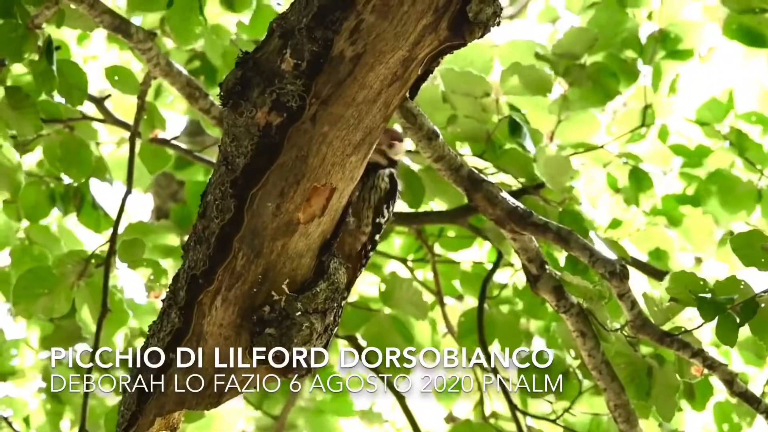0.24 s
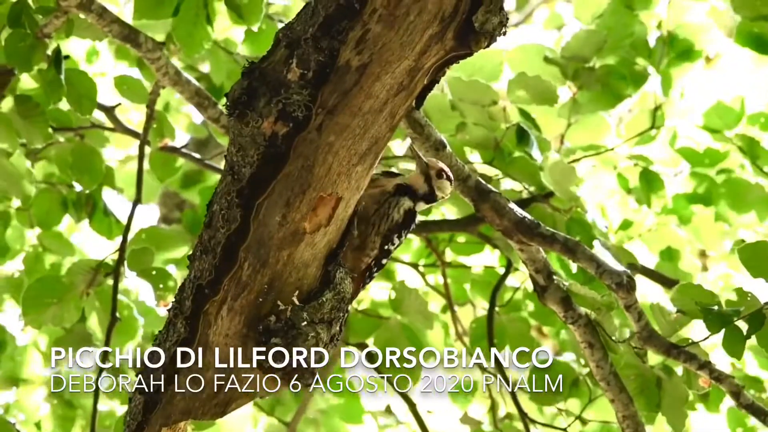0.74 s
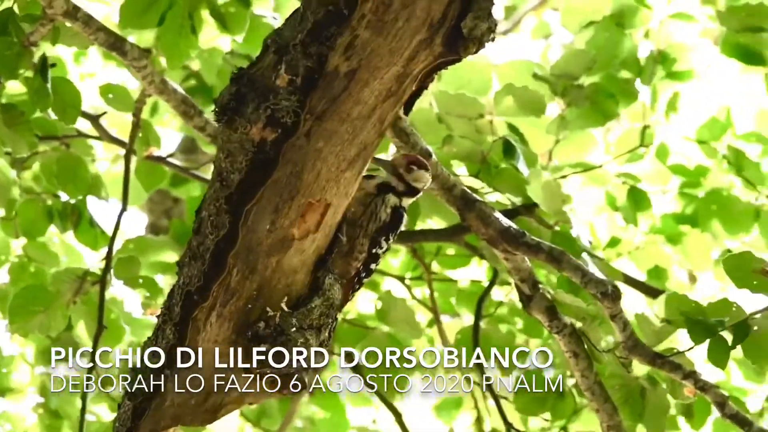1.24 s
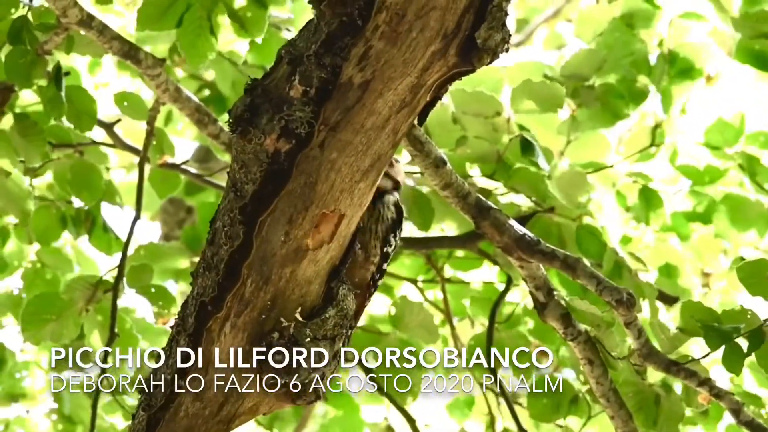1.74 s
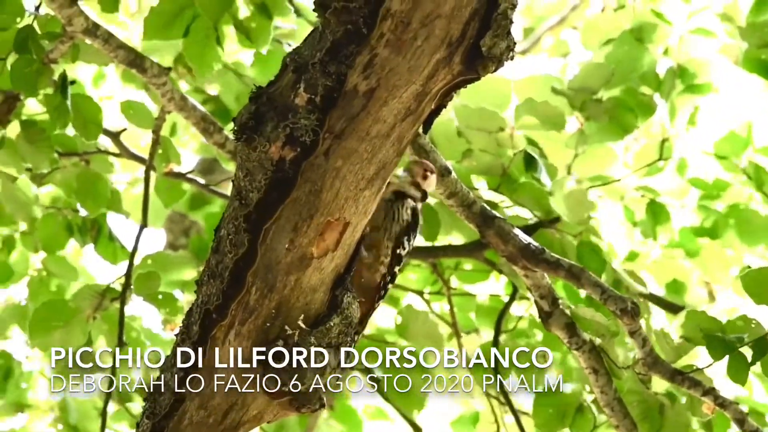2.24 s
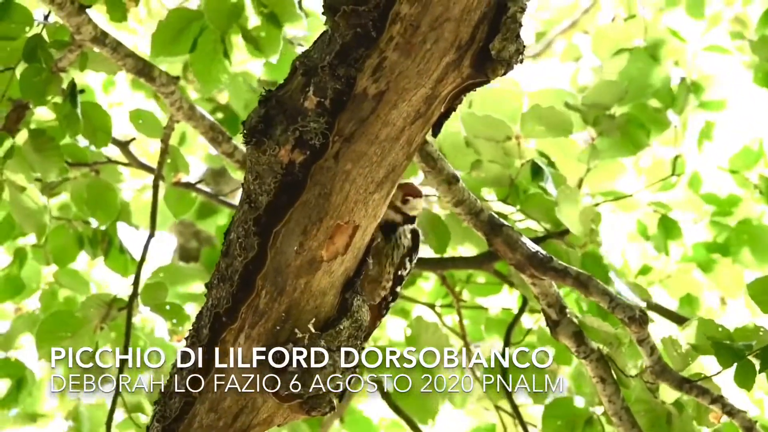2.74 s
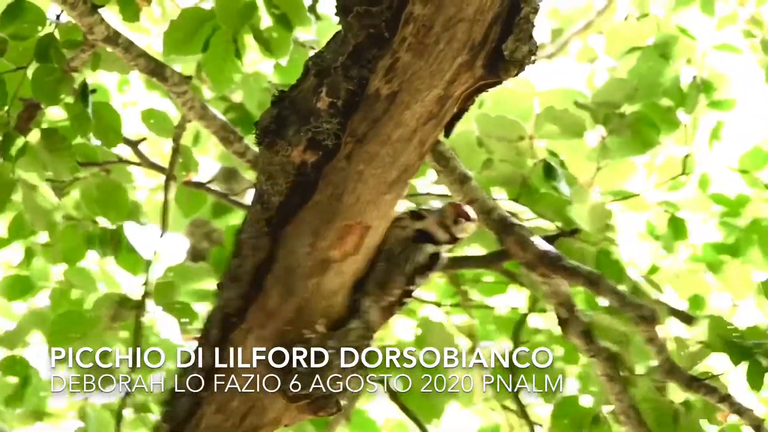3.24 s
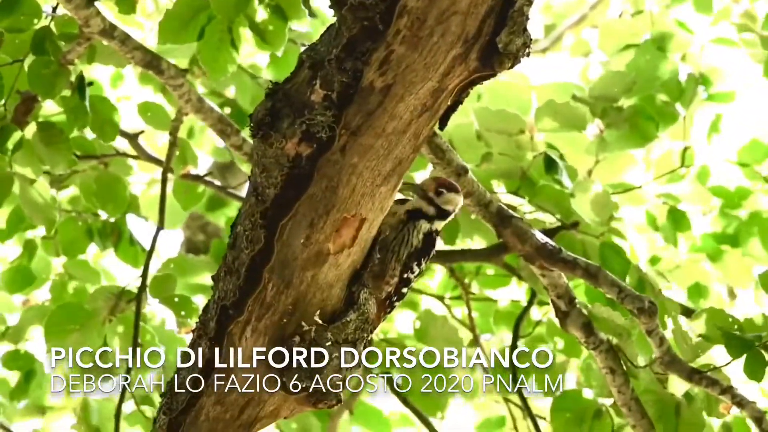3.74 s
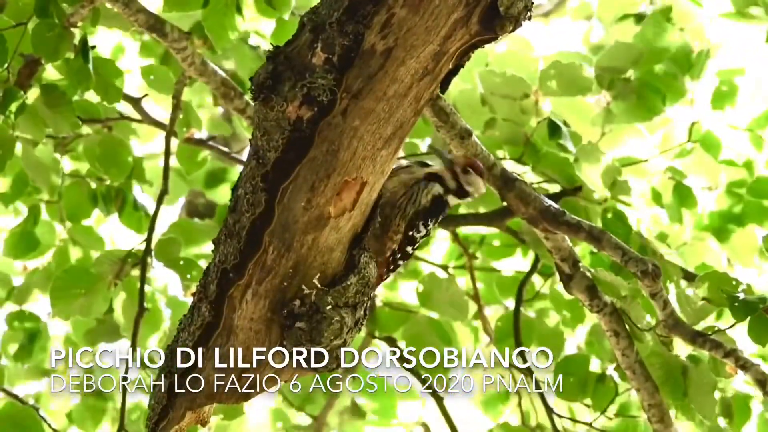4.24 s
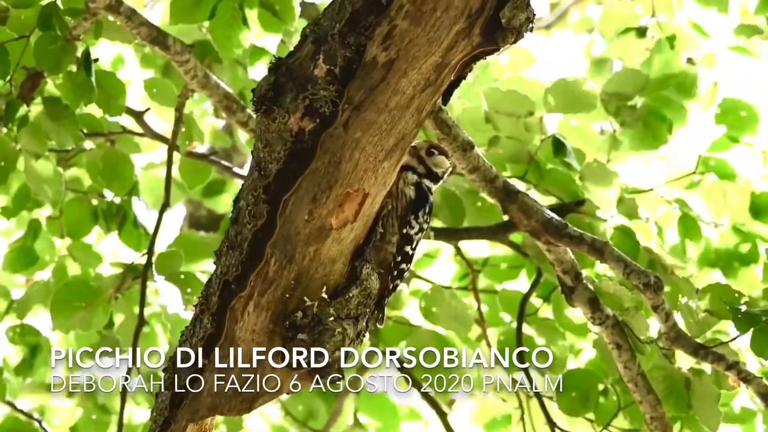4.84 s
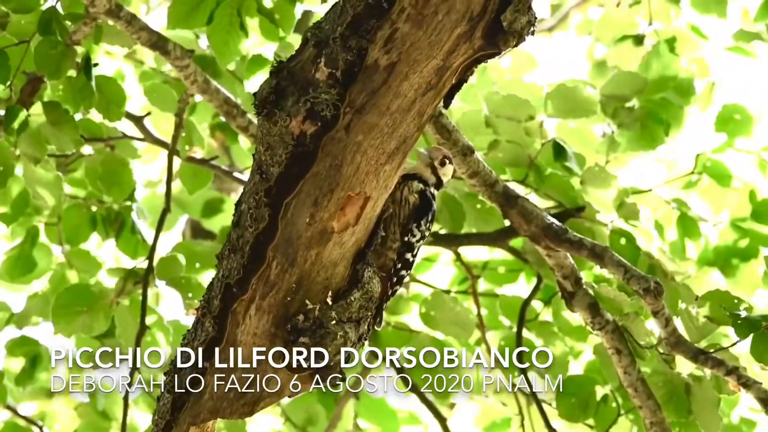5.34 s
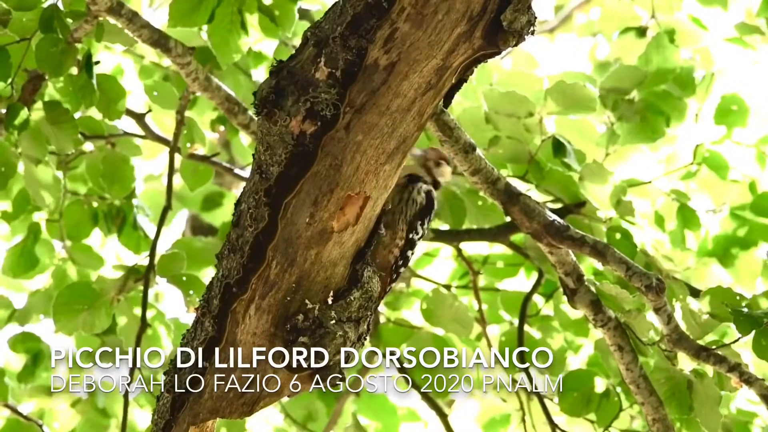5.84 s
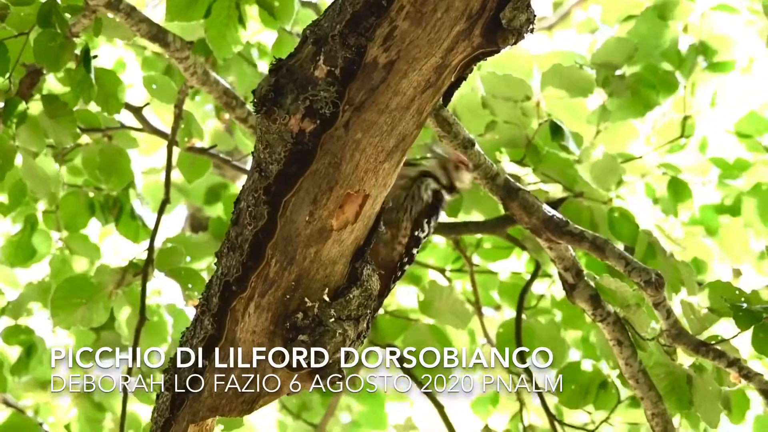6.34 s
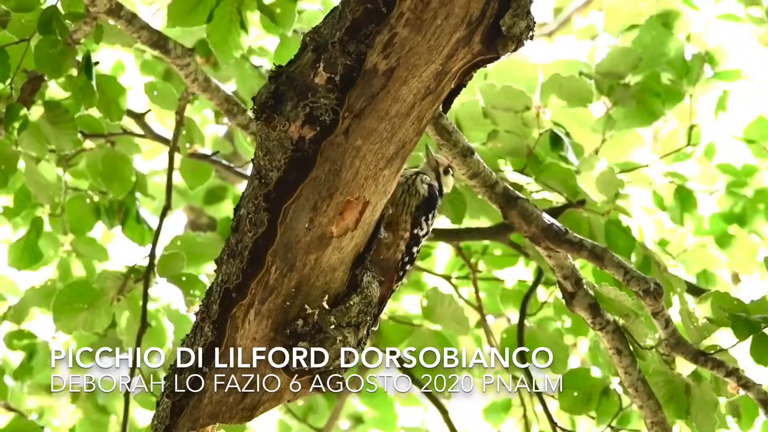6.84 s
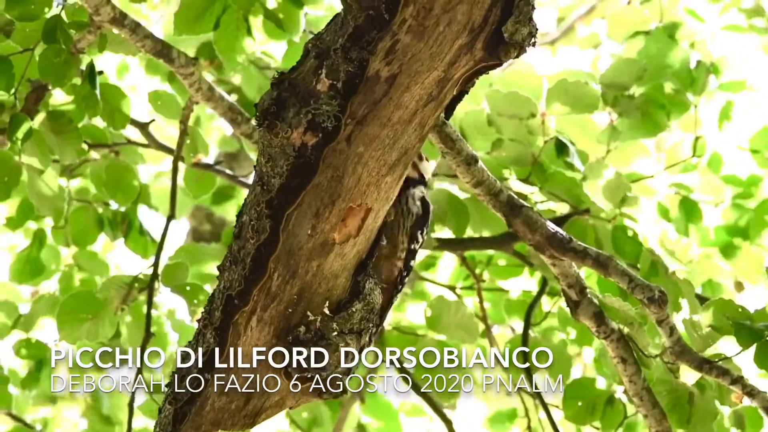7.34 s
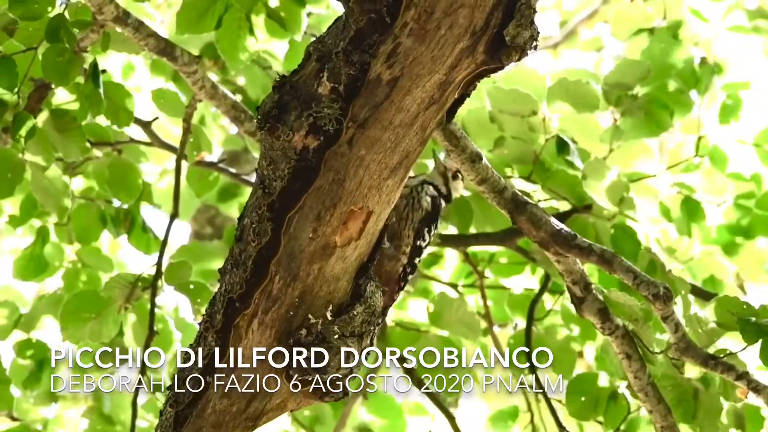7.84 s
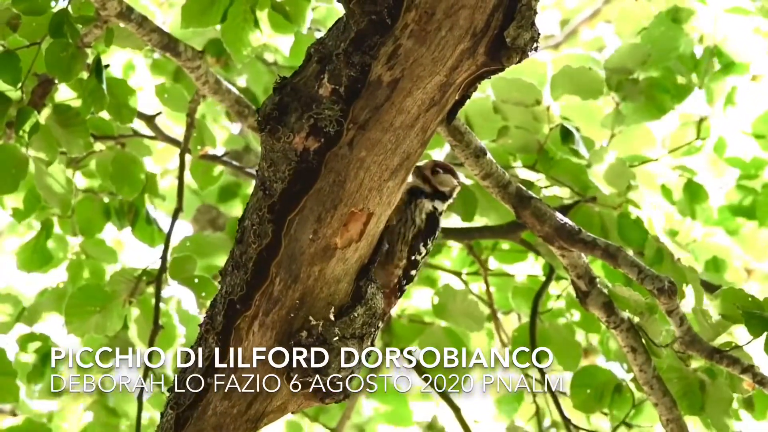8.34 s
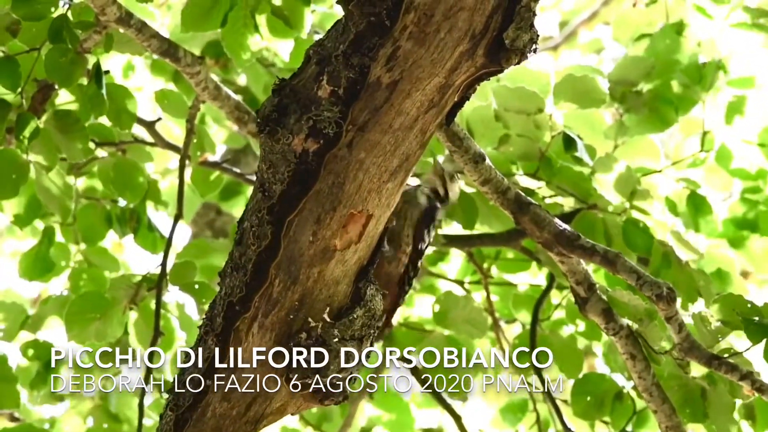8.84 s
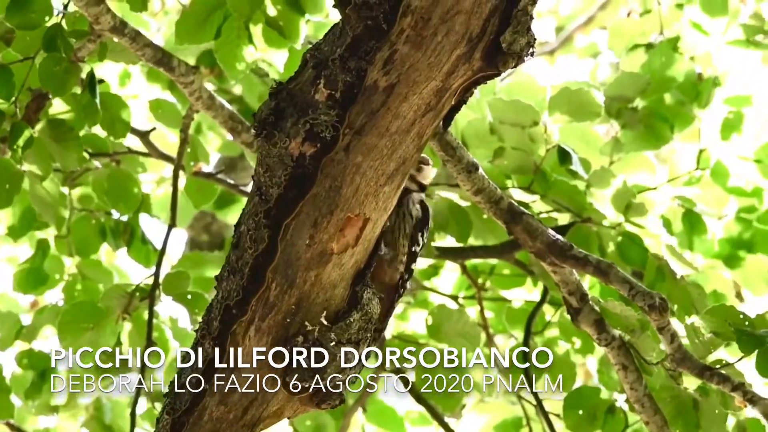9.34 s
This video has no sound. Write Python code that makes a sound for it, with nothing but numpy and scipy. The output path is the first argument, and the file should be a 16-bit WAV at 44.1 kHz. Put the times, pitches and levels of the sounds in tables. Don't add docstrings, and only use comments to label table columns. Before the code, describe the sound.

Sparse hollow pecks on a trunk, sharp bird chips and thin distant twitters over faint leaf hush, with harsh handling snaps in the first four seconds.

```python
import sys
import numpy as np
from scipy import signal
from scipy.fft import rfft, irfft, next_fast_len
from scipy.io import wavfile
from scipy.ndimage import map_coordinates

SR = 44100
rng = np.random.default_rng(int(sys.argv[2]) if len(sys.argv) > 2 else 0)


def wav_record(signal):
    frames = np.transpose(np.atleast_2d(signal))
    bounded = np.clip(frames, -1, 1)
    quanta = np.round(bounded * 32767).astype(np.int16)
    wavfile.write(sys.argv[1], SR, quanta)


def linear_from_db(decibels):
    return 10 ** (np.asarray(decibels, float) / 20)


N = 423360

# frequency in Hz, density in dB per Hz.
LEAVES = [(60, -110), (150, -90), (225, -87), (400, -92), (1000, -97), (1900, -99.5), (2900, -103),
          (16000, -103)]
# frequency in Hz, left-right likeness.
ALIKE = [(150, 0.34), (640, 0.21), (1400, 0.0195), (15000, 0.025)]
# time in seconds, level in dB, left minus right in dB.
BREEZE = [(0.0, -60, -0.5), (0.88, -56.5, -24), (1.31, -54.5, -1), (2.32, -66.5, -8), (2.94, -59.5, -21.5),
          (3.61, -64, 7.5), (4.01, -59, -17), (4.52, -67, -0.5), (5.11, -61, -9), (5.64, -60.5, 20),
          (6.01, -67, -2.5), (6.76, -66.5, 25), (7.27, -61.5, 20.5), (7.83, -70, 10), (8.42, -60, 9.5),
          (8.69, -72.5, 11), (9.12, -63.5, -5), (9.6, -66.5, 6)]
# frequency in Hz, density in dB per Hz.
THUD = [(12, -11), (30, -2.5), (70, 0.5), (120, -9), (200, -17), (300, -47), (500, -120)]
# time in seconds, peak in dB, pitch in Hz.
EDDIES_LEFT = [(.097, -38, 114.4), (1.235, -37, 82), (1.33, -35, 86.9), (1.421, -40, 104),
               (1.693, -36, 98.4), (3.723, -38, 76), (5.378, -40, 91.4), (5.51, -34.5, 89.66),
               (5.626, -38, 65.5), (5.726, -38.5, 103.1), (5.788, -35.5, 102.3), (6.291, -38.5, 107),
               (6.622, -41, 112), (7.125, -40.5, 67.9), (7.203, -34, 103.5), (7.275, -36, 130),
               (7.333, -38, 103), (7.356, -35, 86), (7.519, -37.5, 73), (7.695, -38.5, 78),
               (8.241, -39, 96), (8.467, -38.5, 91), (7.947, -45, 72.8), (8.61, -42, 83),
               (8.684, -40.5, 85), (8.884, -39, 70)]
EDDIES_RIGHT = [(0.171, -33.5, 81.4), (.256, -34.5, 102), (0.33, -37.5, 99), (0.528, -36.5, 93),
                (.713, -35, 75), (1.106, -34.5, 94), (1.131, -39, 124), (1.357, -34.5, 96), (1.42, -38, 76),
                (1.681, -34, 113), (1.704, -34, 83.6), (1.846, -38.5, 72), (2.494, -36.5, 74.6),
                (2.683, -35.5, 83), (2.717, -32, 102), (2.764, -34.5, 87), (3.091, -33.5, 62),
                (3.124, -35.5, 94), (3.263, -37.5, 84), (3.876, -36, 84), (4.08, -38, 70), (4.81, -40, 85),
                (5.087, -35, 85), (5.129, -31.5, 92), (5.905, -37, 77), (9.139, -32.5, 77)]
# frequency in Hz, t60 in seconds.
WOOD = [(300, 0.31), (1500, 0.33), (3000, 0.15), (4500, 0.45), (5600, 0.69), (7000, 0.45), (10000, 0.68)]

# start in seconds, length in seconds, first pitch in Hz, level in dB.
SEEPS = [(.85, 0.12, 6580, -68), (1.001, 0.047, 6600, -64), (1.5, 0.033, 6600, -68),
         (1.551, .04, 6460, -70), (3.85, 0.03, 6430, -63), (4.067, 0.082, 4730, -70),
         (5.471, 0.029, 6430, -61.5), (5.902, .043, 6420, -65), (7.684, 0.063, 6420, -59.5),
         (7.778, .073, 6560, -65), (8.11, 0.084, 6470, -64), (8.222, 0.0763, 6400, -68),
         (8.45, 0.09, 6460, -64), (8.566, .07, 6560, -66), (9.092, 0.075, 6300, -64)]
# start in seconds, first pitch in Hz, level in dB.
CHIPS = [(4.445, 7100, -61), (5.854, 7030, -54), (7.543, 6970, -57.5), (8.896, 7120, -54.5)]
# start in seconds, first pitch in Hz, level in dB.
FALLS = [(.459, 6450, -58), (.52, 6300, -58), (.589, 6170, -63), (2.772, 6290, -62), (2.828, 6395, -57),
         (2.894, 6240, -60)]
RISES = [(.447, 5500, -64), (.503, 5050, -57), (.576, 5270, -62), (2.946, 3450, -66.5), (2.985, 3368, -71)]

# start in seconds, peak in dB, top pitch in Hz, left minus right in dB,
# falling voice in dB.
SCOLDS = [(4.2687, -38, 5270, -6, 1), (4.4353, -35, 5200, -9, -8), (4.5676, -35.5, 5340, -9, -1.5),
          (4.7605, -34.5, 5237, -8, -6), (4.8744, -38, 5080, -5, -2), (5.036, -34.5, 5246, -8, -9),
          (5.3229, -37.5, 5140, -3, -2), (8.3668, -37, 5330, -5, -1), (8.6644, -36, 5244, -7, -3.5),
          (9.24, -36, 5230, -9, -2), (9.425, -37, 5270, -11, -2)]
SCOOPS = [0.39, 0.99, 1.31, 1.1, 1.13, .8, 0.27, 0.794, 1.106, 0.695, 0.806]
# time in ms, share of top pitch, level in dB.
ARCH = [(-8, .88, -22), (-6, .905, -7.5), (-3, .96, -4), (0.5, 1.0, 1.5), (3.5, 1.005, 0), (6, .98, -8.5),
        (13.5, 0.87, -26)]
SLIDE = [(-8, 1.26, -22), (-5, 1.33, -15), (-2.5, 1.25, -22), (1, 1.1, -10), (3, .98, -1), (7, .85, -7.5),
         (11, .76, -11.5), (17.5, 0.65, -30)]
# delay in seconds, level in dB.
BOUGHS = [(.0037, -5.5), (.0071, -9), (0.012, -11), (.0174, -14)]

# time in seconds, peak in dB, low ring in dB, upper ring in dB,
# crack in dB.
SNAPS = [(1.0526, -21, -28, 9.5, -13), (1.067, -3.5, -47, -4.5, -38), (1.987, -25, -33.5, 12.5, -11),
         (1.9964, -5, -26.5, 5.5, -43), (2.587, -42.5, -18, -10, -20), (2.609, -40, -24, -3, -20.5),
         (2.742, -19.5, -39, 11, 3), (2.7488, -5.5, -27.5, 9.5, -7), (2.7445, -29, -34.5, 7, 2),
         (3.096, -17, -46, 6.5, -3), (3.0989, -26, -43.5, 7, -2.5), (3.1019, -2, -44, 5.5, -17.5),
         (3.87, -44, -16, -12, -8), (3.9005, -39, -10, -14.5, -27), (3.912, -19, -41, -7, -15.5),
         (3.9539, -17, -2.5, -7, -17), (8.965, -44, -18, -17.5, -19.5)]
SNAP_HZ = [2115, 2105, 2130, 2120, 2130, 2130, 2130, 2105, 2150, 2150, 2150, 2085, 2120, 2120, 2115, 2075,
           2120]
SNAP_WIDTH = [200, 185, 200, 190, 180, 180, 200, 245, 200, 200, 200, 259.8, 180, 180, 190, 191, 180]
# frequency in Hz, width in Hz, level in dB.
SHELL = [(2678, 520, -5), (3630, 480, -2), (4430, 520, -0.5), (5330, 800, 1.5), (6020, 1100, 1.5),
         (7170, 700, -12)]
# frequency in Hz, level in dB.
THROUGH = [(300, -8), (1400, -10.5), (2000, -25.5), (3100, -27.5), (3800, -12), (5500, -10.5),
           (7500, -18.5), (9000, -4), (11000, -1), (15000, -22)]
# time in seconds, peak in dB, pitch
# in Hz, length in cycles.
THUMPS = [(3.103, -35.5, 280, 0.76), (1.0685, -41.5, 400, 0.82), (1.998, -42, 230, 1.1),
          (1.069, -36.5, 920, 1.2), (1.068, -33, 1500, 2.2), (1.998, -33, 690, 0.95),
          (1.9975, -28, 1400, 2.7), (2.7495, -31.5, 920, 1), (2.75, -36.5, 290, 1.1),
          (3.1025, -30, 780, 1.3), (3.1035, -28, 1500, 2.6), (3.9148, -31.5, 225, 0.55),
          (3.915, -42.5, 580, 2.2), (3.934, -45, 257, 2.4), (3.9545, -19.5, 1880, 1.8), (8.2, -43, 2500, 2),
          (5.5, -56, 3100, 3.2), (3.9545, -29.5, 3760, 2.7)]
# time in seconds, level in dB.
RELEASES = [(1.066, -48), (1.995, -47.5), (2.748, -45), (3.1, -43)]
# crest in seconds, level in dB, rise in seconds, fall in seconds.
CREAKS = [(1.87, -69.5, 0.072, 0.11), (2.6, -63, 0.063, 0.079), (2.73, -62, 0.044, .02),
          (3.085, -57.5, 0.15, 0.032)]

# start in seconds, length in seconds, centre in Hz, level in dB.
RUSTLES = [(0.352, 0.049, 6800, -62.5), (0.91, 0.063, 4660, -61), (1.69, 0.049, 6840, -61),
           (2.107, 0.03, 5760, -70), (2.596, 0.032, 4800, -68), (3.609, .03, 5020, -72),
           (3.612, 0.038, 2500, -66), (5.986, .04, 3500, -63), (0.427, 0.17, 2150, -62),
           (0.909, 0.058, 2100, -62)]
# time in seconds, peak in dB, hollow knock in dB, hard knock in dB, splinter in dB.
BLOWS = [(0.07, -38.5, -4, -9, -28), (0.3974, -37, -10.5, -11, -6.5), (1.672, -43.5, -2, -1.5, -13),
         (2.102, -37, -13, -1, -7.5), (2.539, -56, -9, 6.5, -3.5), (2.716, -41.5, -6.5, 1, -9),
         (2.922, -44.5, -8, -16.5, -8), (4.334, -53.5, -11, -0.5, 3), (4.534, -54.5, 1, -6, 0),
         (4.705, -57, -5, -9.5, 2), (5.7194, -43, -3, -17, -2.5), (5.979, -40.5, -11.5, -10, -15),
         (6.216, -49.5, -6.5, -8.5, -8), (6.454, -55, -3, -8, -4), (6.945, -40.5, -3.5, -6, -3),
         (7.244, -34.5, -15, -4.5, -11.5), (7.695, -47, -1.5, 4, -3.5), (7.923, -56, -9, 2.5, -1),
         (8.639, -43.5, -3, 1, -5), (8.885, -38.5, -5, -10, -15), (9.231, -47, -5.5, 1.5, -11),
         (9.5, -51, -8, -2, -2)]
# heartwood knock in dB, sapwood knock in dB, rim knock in dB.
SPOTS = [(-26, -2, -4.5), (-10.5, -5.5, -6), (-17, -7, -2), (-19, -7.5, -4.5), (-9, -2, -10.5),
         (-7, -7, -9), (-5.5, -5.5, -7), (-10, -9, -2), (-8, -6, -4), (-13, -4, -3), (-9, -3.5, -16),
         (-12, -5.5, -2.5), (-5, -2, -8.5), (-7.5, -6, -4), (-24, -2, -3), (-7.5, -4, -1), (-2.5, -8, -4.5),
         (-14, -5, -2), (-8, -2, -11.5), (-9, -2, -9), (-5, -1.5, -10), (-13, -10, -3)]
# frequency in Hz, level in dB, t60 in seconds.
TRUNK = [(307, -3.5, .07), (388.5, -6.5, .06), (447.6, 2.5, 0.051), (866, 0, 0.039), (960, -6, .04),
         (1057, -4, .045), (1129, -3.5, 0.06), (1194, 1.5, 0.033), (1325, -6.5, .03), (1392, -1.5, 0.023),
         (1628, -3.5, .03), (1713, -4, 0.027), (2052, -2, 0.024), (2550, -1.5, 0.012)]

# frequency in Hz, level in dB.
MIC = [(6600, -0.5), (7200, -9), (8600, -12.5), (10200, -13.5), (11500, -8.5), (15700, -12.5),
       (16100, -53.5)]
# frequency in Hz, half width in Hz.
NOTCHES = [(7630, 310), (9590, 250)]

SHELL_HZ, SHELL_LIFT = 2125, 0.37
SMALL_EDDIES = 50
EDDY_DB, EDDY_SCATTER_DB = 11.5, 3.5
EDDY_LEAN = .45
EDDY_HZ, EDDY_SPREAD = 82, .18
SEEP_SAG = 0.037
CHIP_S, CHIP_ENDS = 0.024, .917
FALL_S, FALL_ENDS = .013, .89
RISE_S, RISE_ENDS = .012, 1.2
STRETCH, STRETCH_SPREAD = 0.99, 0.051
SURGE_DB_PER_S, DROP_DB_PER_S = 780, 1500
SETTLE_DB, SETTLE_DB_PER_S = -14, 249
CREAK_RANGE_DB = 22.5


def unit(x):
    return x / np.sqrt(np.mean(x ** 2) + 1e-20)


def peaked(x, db):
    return linear_from_db(db) * x / np.abs(x).max()


def noise(t):
    return rng.standard_normal(len(t))


def along(points, hz):
    f, v = np.transpose(points)
    return np.interp(np.log(hz + 1), np.log(f + 1), v)


def curve(rows, column=1):
    rows = np.array(rows)
    return np.interp(np.arange(N) / SR, rows[:, 0], rows[:, column])


def filtered(x, response):
    m = next_fast_len(x.shape[-1] + 8192)
    return irfft(rfft(x, m) * response(np.fft.rfftfreq(m, 1 / SR)), m)[..., :x.shape[-1]]


def ring(f, hz, width_hz):
    return 1j * f * width_hz / (hz * hz - f * f + 1j * f * width_hz)


def add(track, s, sound):
    at = round(s * SR)
    end = min(at + sound.shape[1], track.shape[1])
    track[:, at:end] += sound[:, :end - at]


def wobble(rate):
    knots = rng.standard_normal(int(N * rate / SR) + 4)
    return map_coordinates(knots, [np.arange(N) * rate / SR])


def puff(db, hz, cycles):
    t = np.arange(-SR // 40, SR // 40) / SR
    return linear_from_db(db) * np.exp(-(t * hz / cycles) ** 2) * np.cos(2 * np.pi * (hz * t + rng.random()))


def in_wood(x, echo_db, lr_db, gap=0.0036, stir=0.):
    hz, t, z = signal.stft(rng.standard_normal((2, 3 * SR // 10)), SR, nperseg=128)
    trunks = 1 + .5 * np.exp(-((t - .045) / 0.0027) ** 2)
    shape = (1 - np.exp(-t / gap)) * trunks
    decay = linear_from_db(-60 * t / along(WOOD, hz)[:, None])
    tail = signal.istft(z * decay * shape, SR, nperseg=128)[1]
    tail = linear_from_db(echo_db) * tail / np.linalg.norm(tail[0])
    smear = 1 + stir * unit(filtered(noise(x), lambda f: ring(f, 450, 460)))
    out = signal.fftconvolve((smear * x)[None], tail, axes=1)
    add(out, 0, x * linear_from_db(np.array([[lr_db], [-lr_db]]) / 2))
    return out


def forest():
    def turn(f):
        return np.arccos(np.clip(along(ALIKE, f), -1, 1)) / 2

    def hush(f):
        colour = linear_from_db(along(LEAVES, f)) * (1 + SHELL_LIFT * ring(f, SHELL_HZ, 300))
        return colour * [np.cos(turn(f)), np.sin(turn(f))]

    white = np.sqrt(SR) * rng.standard_normal((2, N)) / np.sqrt(2)
    mid, side = filtered(white, hush)
    sway_db = 0.433 * wobble(3.1) + 0.726 * wobble(14)
    return linear_from_db(sway_db + np.array([[-.6], [.6]])) * np.array([mid + side, mid - side])


def small_eddies(side):
    s, level_db, lr_db = np.transpose(BREEZE)
    at = rng.uniform(0.036, s[-1], SMALL_EDDIES)
    size, pitch = rng.standard_normal((2, SMALL_EDDIES))
    breeze_db = np.interp(at, s, level_db + side * EDDY_LEAN * lr_db)
    db = breeze_db + EDDY_DB + EDDY_SCATTER_DB * size
    return list(zip(at, db, EDDY_HZ * np.exp(EDDY_SPREAD * pitch)))


def breeze():
    lean_db = np.clip(curve(BREEZE, column=2) * 1.1, -4, 4) * np.array([[1], [-1]])
    lumps = linear_from_db(2.6 * np.array([wobble(28), wobble(28)]))
    rumble = filtered(lumps * rng.standard_normal((2, N)), lambda f: linear_from_db(along(THUD, f)))
    out = linear_from_db(curve(BREEZE) + 6.0 + lean_db) * unit(rumble)
    for port, eddies in enumerate([EDDIES_LEFT, EDDIES_RIGHT]):
        for s, db, hz in eddies + small_eddies(1 - 2 * port):
            add(out[port:port + 1], s - 1 / 40, puff(db, hz, cycles=0.51)[None])
    return out


def lisper():
    out = np.zeros((2, N))
    notes = [(s, length, hz, 1 - SEEP_SAG, db) for s, length, hz, db in SEEPS]
    flicks = [(CHIPS, CHIP_S, CHIP_ENDS), (FALLS, FALL_S, FALL_ENDS), (RISES, RISE_S, RISE_ENDS)]
    for rows, length, ends in flicks:
        notes += [(s, length, hz, ends, db) for s, hz, db in rows]
    for s, length, hz, ends, db in notes:
        u = np.arange(round(length * SR)) / (length * SR)
        glide = hz * (1 + (ends - 1) * u)
        note = np.sin(np.pi * u) ** 0.35 * np.sin(2 * np.pi * np.cumsum(glide) / SR)
        add(out, s, in_wood(linear_from_db(db - 3.0) * note, echo_db=-1.0, lr_db=-8.0, gap=.003, stir=0.43))
    return out


def whistle(shape, top_hz, overtones, stretch):
    ms, share, db = np.transpose(shape)
    at = np.arange(-10, 30, 1000 / SR) / stretch
    waver = 1 + 0.0054 * np.sin(2.25 * at + 2 * np.pi * rng.random())
    phase = 2 * np.pi * np.cumsum(top_hz * np.interp(at, ms, share) * waver) / SR
    size = linear_from_db(np.interp(at, ms, db, left=-90, right=-90))
    return size * sum(linear_from_db(g) * np.sin(k * phase) for k, g in overtones)


def scolder():
    out = np.zeros((2, N))
    for (s, db, hz, lr_db, fall_db), scoop in zip(SCOLDS, SCOOPS):
        arch = [(ms, 1 - (1 - share) * (scoop if ms < 0 else 1), level) for ms, share, level in ARCH]
        stretch = STRETCH + STRETCH_SPREAD * rng.standard_normal()
        fall_db = fall_db + rng.normal(0, 2.1)
        note = whistle(arch, hz / 2, [(1, -24.5), (2, -2.0), (3, -39.0)], stretch)
        note = note + whistle(SLIDE, hz, [(0.99, fall_db)], stretch)
        hoarse = 1 + .2 * unit(filtered(noise(note), lambda f: ring(f, 550, 500)))
        note = hoarse * note
        answers = [linear_from_db(g + rng.normal(0, 2)) * np.roll(note, round(lag * rng.uniform(.85, 1.15) * SR))
                   for lag, g in BOUGHS]
        note = note + sum(answers)
        sound = in_wood(linear_from_db(db - 4.5) * note, echo_db=-4.5, lr_db=lr_db, gap=0.0025, stir=0.99)
        add(out, s - 9 / 1000, sound)
    return out


def upper_shell(f):
    modes = sum((-1) ** (k + 1) * linear_from_db(db) * ring(f, hz, width_hz)
                for k, (hz, width_hz, db) in enumerate(SHELL))
    return modes * ring(f, 4200, 7700)


def across(x, lift_db):
    late = filtered(x, lambda f: linear_from_db(along(THROUGH, f) + lift_db) * np.exp(-2j * np.pi * f * 0.00021))
    return np.array([late, x])


def tent(s, db, rise_db_per_s, fall_db_per_s):
    t = np.arange(N) / SR - s
    return linear_from_db(db + np.minimum(rise_db_per_s * t, -fall_db_per_s * t))


def grip_strain():
    jolts = sum(tent(s, db, SURGE_DB_PER_S, DROP_DB_PER_S) for s, db in RELEASES)
    settling = sum(tent(s, db + SETTLE_DB, SURGE_DB_PER_S, SETTLE_DB_PER_S) for s, db in RELEASES)
    creaks = sum(tent(s, db, CREAK_RANGE_DB / rise, CREAK_RANGE_DB / fall) for s, db, rise, fall in CREAKS)
    return jolts + creaks, settling


def snap(low_db, upper_db, crack_db, hz, width_hz):
    def main_ring(f):
        return (ring(f, hz, width_hz) - 0.33 * ring(f, 1.22 * hz, 450)) * ring(f, 1.03 * hz, 1100)

    def crack_ring(f):
        return (ring(f, 8700, 1500) - 1.1 * ring(f, 11000, 2200)) * ring(f, 10000, 5000)

    t = np.arange(SR // 25) / SR
    push = t * np.exp(-t / 0.0000833)
    slip = noise(t) * t * (np.exp(-t / 0.00043) + linear_from_db(-46.5) * np.exp(-t / 0.0022))
    slip = .2 * slip / np.abs(slip).max() + linear_from_db(-60 * t / .0003)
    tone = peaked(filtered(push, main_ring), -1.5)
    low = peaked(filtered(push, lambda f: ring(f, 1160, 150) * ring(f, 1169, 1000)), low_db - 4.0)
    upper = peaked(filtered(slip, upper_shell), upper_db)
    crack = peaked(filtered(slip * linear_from_db(-60 * t / 0.0036), crack_ring), crack_db + 6.0)
    mutter = filtered(noise(t) * linear_from_db(-60 * t / 0.051), lambda f: ring(f, 1.1 * hz, 350) ** 2)
    tone = tone + peaked(mutter, -28.5)
    return low - tone + upper + crack


def creaking():
    def whisper_ring(f):
        low = ring(f, 2150, 300) + linear_from_db(-13) * ring(f, 2600, 700)
        return low + linear_from_db(-20) * upper_shell(f) + linear_from_db(-22) * ring(f, 11000, 3000)

    def hum_ring(f):
        return ring(f, 2140, 320) ** 2 + linear_from_db(-22) * ring(f, 2800, 900)

    grit = rng.standard_normal(N) * linear_from_db(4.5 * wobble(300))
    whisper = across(filtered(grit, whisper_ring), lift_db=2.5)
    hum = across(filtered(grit, hum_ring), lift_db=2.5)
    strain, settling = grip_strain()
    return linear_from_db(8.5) * (strain * unit(whisper) + settling * unit(hum))


def camera():
    out = np.zeros((2, N))
    for (s, db, low_db, upper_db, crack_db), hz, width_hz in zip(SNAPS, SNAP_HZ, SNAP_WIDTH):
        add(out, s, linear_from_db(db) * across(snap(low_db, upper_db, crack_db, hz, width_hz), lift_db=-2))
    for s, db, hz, cycles in THUMPS:
        add(out, s - 1 / 40, across(puff(db, hz, cycles), lift_db=-2.5))
    return out + creaking()


def rustles():
    out = np.zeros((2, N))
    for s, length, hz, db in RUSTLES:
        scuff = rng.standard_normal((2, round(length * SR)))
        scuff = filtered(scuff, lambda f: ring(f, hz, .22 * hz) ** 2)
        add(out, s, linear_from_db(db) * unit(scuff) * np.hanning(scuff.shape[1]))
    return out


def woodpecker():
    out, t = np.zeros((2, N)), np.arange(SR // 10) / SR
    for (s, db, hollow_db, hard_db, splinter_db), (heart_db, sap_db, rim_db) in zip(BLOWS, SPOTS):
        modes = np.array([linear_from_db(level + rng.normal(0, 2.7) - 60 * t / t60) * np.sin(2 * np.pi * hz * t)
                          for hz, level, t60 in TRUNK])
        modes = modes * (1 - np.exp(-t / 0.0012))
        groups = [part.sum(0) for part in np.split(modes, [3, 5, 8, 10])]
        knocks_db = [hollow_db, heart_db, sap_db, rim_db, hard_db]
        knock = sum(peaked(group, knock_db) for group, knock_db in zip(groups, knocks_db))

        chip = noise(t) * (linear_from_db(-60 * t / 0.0092) + linear_from_db(-9.5 - 60 * t / 0.13)) * (1 - np.exp(-t / 0.00076))
        chip = filtered(chip, lambda f: ring(f, 4200, 5480) ** 2)
        crush = noise(t) * (linear_from_db(-60 * t / 0.029) + linear_from_db(-10.5 - 60 * t / 0.16))
        crush = filtered(crush, lambda f: ring(f, 1100, 1700) ** 2)

        body = peaked(crush, -4.5) - knock
        body = filtered(body, lambda f: 1 / (1 + 1j * f / 5500) ** 2)
        blow = linear_from_db(1.0) * body + peaked(chip, splinter_db - 1.0)
        add(out, s, in_wood(linear_from_db(db + 3.5) * blow, echo_db=-4.5, lr_db=-1.0, stir=0.8))
    return out


def scene():
    def notch(f):
        return np.prod([1 - .96 * np.exp(-((f - hz) / width_hz) ** 4) for hz, width_hz in NOTCHES], axis=0)

    air = forest() + breeze() + lisper() + scolder() + rustles() + woodpecker()
    return filtered(air, notch) + camera()


def top_cut(x):
    return signal.sosfilt(signal.butter(12, 16450, fs=SR, output="sos"), x)


def record(dry):
    heard = filtered(dry, lambda f: linear_from_db(along(MIC, f)))
    mix = heard / (1 + np.abs(heard / 1.35) ** 6) ** (1 / 6)
    return top_cut(mix)


dry = scene()
out = record(dry)
wav_record(out)
```